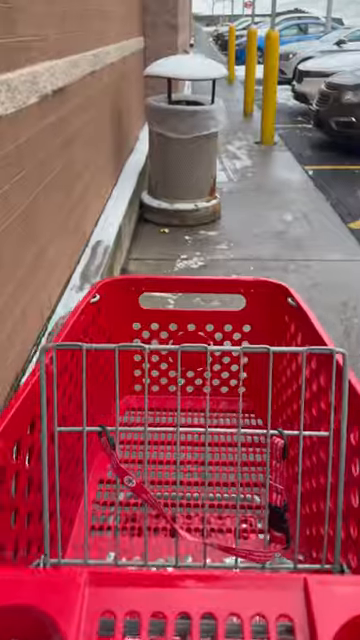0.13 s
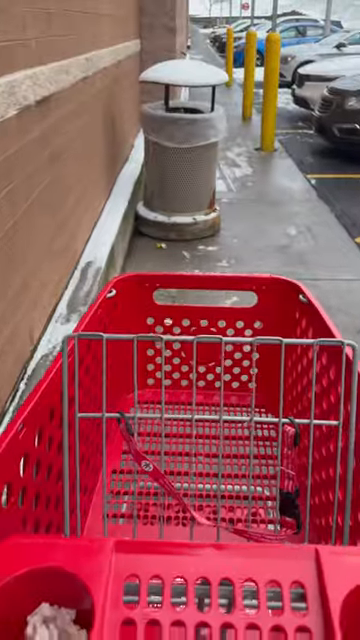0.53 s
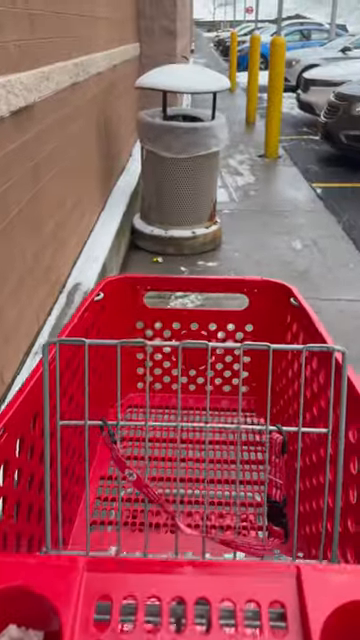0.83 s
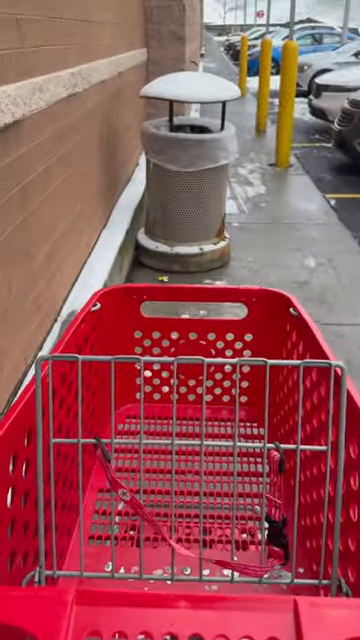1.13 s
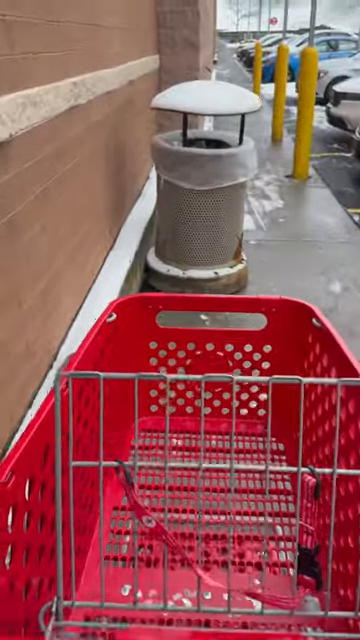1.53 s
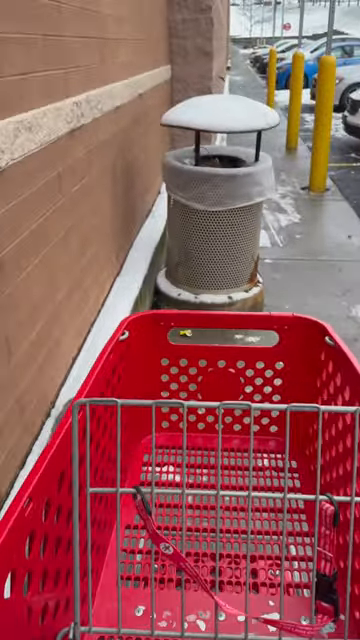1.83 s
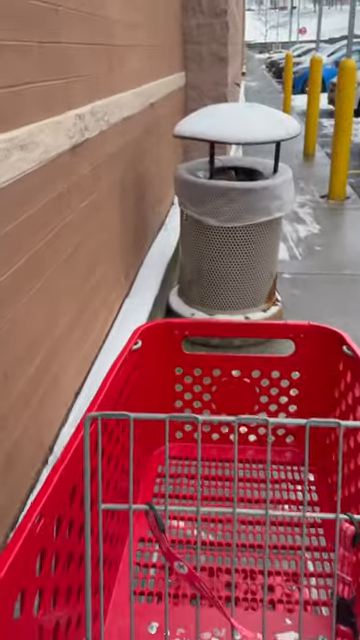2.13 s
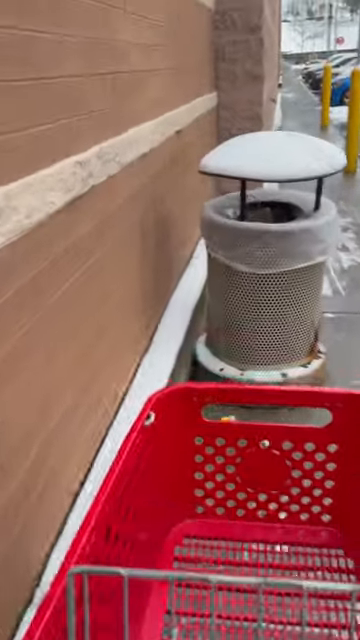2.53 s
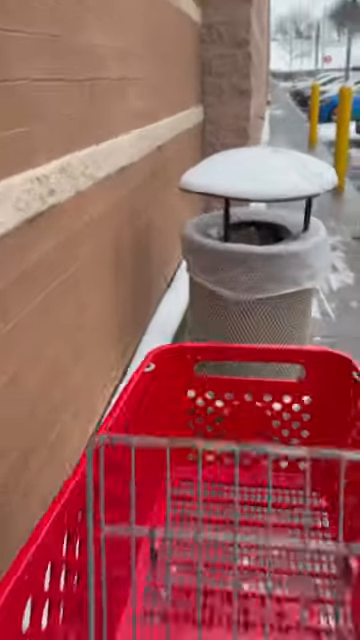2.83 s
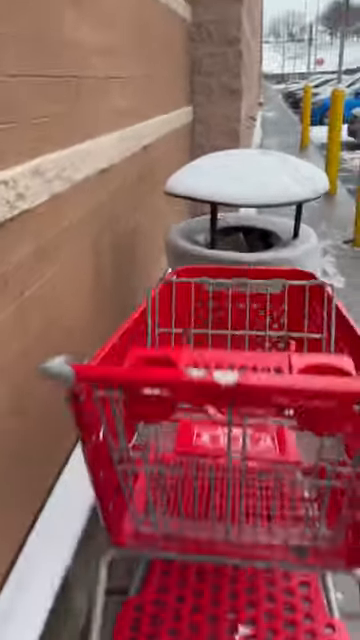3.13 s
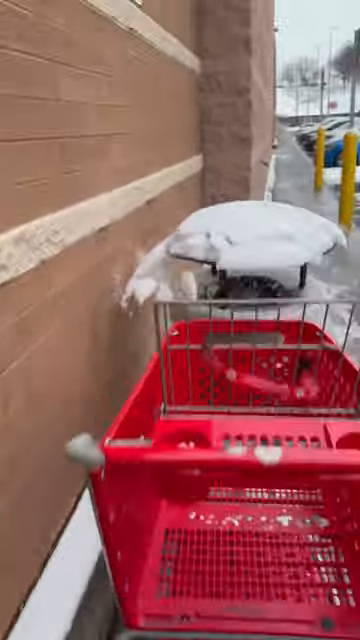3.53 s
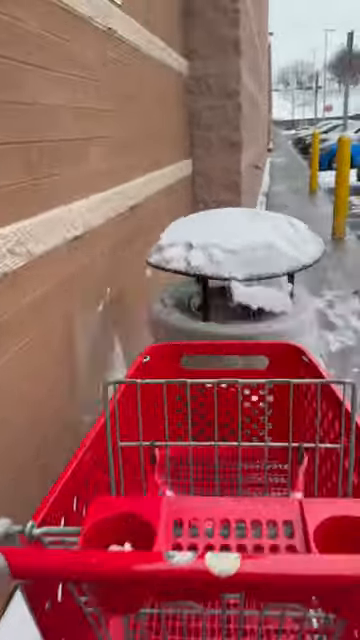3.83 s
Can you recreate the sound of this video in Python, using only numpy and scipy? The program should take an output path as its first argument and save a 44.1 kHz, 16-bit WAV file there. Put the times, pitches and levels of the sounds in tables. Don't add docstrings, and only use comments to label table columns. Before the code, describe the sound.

Shopping cart clinks and rumbles along, gets shoved, and slams a steel bin with clattering rebounds

```python
import sys
import numpy as np
from scipy import signal
from scipy.fft import rfft, irfft, next_fast_len
from scipy.io import wavfile
from scipy.ndimage import map_coordinates

SR = 44100
rng = np.random.default_rng(int(sys.argv[2]) if len(sys.argv) > 2 else 0)


def put_to_file(sound):
    columns = np.atleast_2d(sound).T
    safe = np.clip(columns, -1, 1)
    whole_steps = np.round(safe * 32767)
    wavfile.write(sys.argv[1], SR, whole_steps.astype(np.int16))


def volts(x):
    e = np.asarray(x, float) / 20
    return 10 ** e


N = 176400

# time in seconds, wire level in dB, plastic over wire in dB.
SHAKING = [(.04, -47.5, 13.5), (.85, -37.5, -3.5), (.97, -40.5, 13), (1.1, -41.5, 12.5), (1.28, -47.5, 5),
           (1.97, -46, 6.5), (2.09, -17, -5.5), (2.16, -24, 0.5), (2.25, -41.5, 10), (2.47, -63, 15),
           (2.87, -36.5, 1), (2.97, -14.5, -6), (3.13, -17, -5.5), (3.175, -33.5, 5.5), (3.3, -23, -8.5),
           (3.69, -24, -8), (3.8, -26.5, -6.5), (3.93, -34, -5.5), (3.97, -16.5, -10)]
# start in seconds, peak in dB.
EARLY_CLINKS = [(0.057, -11.5), (0.0792, -10), (0.129, -17.5), (0.1552, -20.5), (0.192, -23),
                (0.253, -22.5), (0.2874, -20.5), (0.3156, -20), (0.431, -25.5), (0.4584, -17.5),
                (0.5372, -19), (0.59, -25), (0.6784, -26), (0.7003, -20), (0.717, -10), (0.8049, -14),
                (0.812, -15.5), (0.837, -15.5), (0.8955, -10), (0.9323, -5), (0.9601, -14.5),
                (0.9772, -8.5), (0.986, -15), (1.0199, -16), (1.0338, -9.5), (1.0515, -11.5), (1.0745, -8),
                (1.0882, -15.5), (1.1166, -18), (1.1752, -24.5)]
LATE_CLINKS = [(1.245, -24.5), (1.3216, -18), (1.359, -20.5), (1.4357, -28), (1.4828, -22), (1.5525, -26),
               (1.5887, -18), (1.6317, -23), (1.6637, -23), (1.7068, -13), (1.734, -14), (1.871, -20),
               (1.998, -10.5), (2.0282, -22), (2.0341, -11.5), (2.093, -11), (2.1534, -15), (2.2617, -17.5),
               (2.3235, -18), (2.3853, -25), (2.5494, -37), (2.885, -17.5), (2.9362, -12.5), (2.965, -15),
               (3.0105, -13), (3.179, -11.5), (3.706, -6), (3.957, -11)]
# start in seconds, peak in dB, ringing in Hz (not sounded), rise
# in seconds.
GATE_SLIDES = [
    (2.5, -35, 7000, 0.0057),
    (2.585, -25.5, 7000, 0.0088),
    (2.74, -24, 6500, .012),
    (2.762, -21, 7000, 0.0032),
    (2.84, -45, 6900, 0.011),
]
# frequency in Hz, width in Hz, level in dB.
WIRE_MODES = [(4260, 35, 5), (4630, 59, 2), (5450, 47, -2), (5960, 260, -7), (7140, 40, 0),
              (7920, 140, -4.5)]
# frequency in Hz, level in dB.
WIRE_COLOUR = [(1200, -8), (2800, -4.5), (4200, -7), (6500, -1.5),
               (9000, 0), (10500, -4), (12000, -8), (15600, -9)]
# frequency in Hz, level in dB.
TICK_COLOUR = [(2500, -38), (3800, 0), (4500, 6), (6200, -2.5), (9000, 4.5), (16000, -10)]
# start in seconds, peak in dB.
BASKET_KNOCKS = [(0.076, -16), (0.115, -21), (0.198, -21), (0.288, -23), (0.435, -19), (0.539, -16.5),
                 (0.677, -19.5), (0.723, -15.5), (0.766, -18), (0.812, -15.5), (0.837, -16), (0.896, -22.5),
                 (0.934, -19), (0.96, -17), (0.985, -16), (1.04, -14.5), (1.074, -16), (1.143, -23),
                 (1.173, -18), (1.241, -19.5), (1.323, -20), (1.359, -19.5), (1.439, -20), (1.52, -22.5),
                 (1.614, -18), (1.634, -23), (1.711, -16.5), (1.893, -22.5), (1.999, -19), (2.061, -13),
                 (2.262, -19), (2.319, -19.5), (2.383, -20), (2.573, -25.5)]
# frequency in Hz, width in Hz, level in dB.
BASKET_MODES = [(437, 260, 8.5), (641.5, 4.3, 12), (924, 120, -3.5), (1300, 17, -48), (1674, 13, 4.5),
                (1971, 62, 1), (2270, 12, -36)]
# frequency in Hz, level in dB.
BASKET_COLOUR = [(120, -2.5), (300, -9.5), (600, -3), (1200, 4), (2200, 2), (3200, -5.5), (7000, -23.5)]
# start in seconds, peak in dB, ringing in Hz, rise in seconds.
CRASH_BLOWS = [(3.179, -10, 2130, 0.0012), (3.19, -7, 1980, .003), (3.2035, -4.5, 2270, 0.00069),
               (3.207, -5, 1390, 0.0016), (3.215, -3, 950, 0.0014), (3.228, 0, 1390, .0025),
               (3.236, -9.5, 1870, 0.0017), (3.247, -8, 870, 0.00079), (3.256, -10, 2440, 0.0026),
               (3.263, -3, 1040, 0.00076), (3.271, -8, 2250, .002), (3.283, -7, 860, 0.0016),
               (3.3, -15, 850, 0.0023), (3.313, -9, 2740, 0.0033), (3.327, -5, 2380, 0.0013),
               (3.418, -4.5, 2550, 0.0013), (3.428, -9, 1245, 0.0015), (3.436, -6.5, 1060, 0.0016),
               (3.447, -5, 864, 0.005), (3.535, -6.5, 2560, 0.00061), (3.546, -8.5, 2440, 0.00089),
               (3.636, -11, 950, 0.0022), (3.647, -6, 2550, 0.00075), (3.665, -10, 900, 0.0022),
               (3.703, -10.5, 1300, .002), (3.707, -1.5, 2437, 0.0017), (3.72, -8, 1020, 0.0023),
               (3.73, 0, 613, 0.0077), (3.734, -5.5, 1310, 0.0032), (3.755, -7, 650, 0.0037),
               (3.948, -13, 1960, 0.0028), (3.957, -12.5, 1200, .002), (3.98, -11, 2040, 0.0024)]
# time in seconds, level in dB.
GRINDING = [(3.17, -70), (3.182, -29), (3.2, -27), (3.208, -16), (3.27, -18), (3.295, -28), (3.335, -28.5),
            (3.4, -36), (3.6, -70)]
# frequency in Hz, level in dB.
BIN_COLOUR = [(60, -28), (200, -0.5), (700, -2), (1500, 0.5), (2500, -1.5), (4000, -6), (8000, -19),
              (16000, -31)]
# frequency in Hz, width in Hz, level in dB.
BIN_MESH = [(2550, 2000, -7)]
# start in seconds, level in dB, pitch in Hz.
TUBE_PINGS = [
    (.538, -24.5, 1990),
    (1.05, -25.5, 1940),
    (3.04, -29, 212),
    (3.21, -21.5, 218),
    (3.24, -25.5, 299),
    (3.262, -26.5, 164),
    (3.71, -30.5, 216),
]
# start in seconds, length in seconds, level in dB, pitch in Hz, pitch roughness in Hz.
CASTER_SQUEAK = (2.76, .105, -40, 3600, 120)
# time in seconds, level in dB.
ROLLING = [
    (.04, -34),
    (.9, -38.5),
    (1.2, -36),
    (1.6, -35),
    (2.3, -37),
    (2.9, -33),
    (3.3, -38),
    (3.6, -55),
    (4, -70),
]
# start in seconds, peak in dB, thud pitch in Hz.
JOINT_BUMPS = [
    (0.849, -17, 64),
    (1.26, -24, 71.5),
    (1.768, -20, 79),
    (2.332, -19, 69.5),
    (2.751, -16.5, 55.5),
    (3.269, -24.5, 84.5),
    (3.479, -21.5, 100),
]
# frequency in Hz, level in dB.
RUMBLE_COLOUR = [(15, -51), (30, -11.5), (60, 0.5), (120, -4), (200, -14.5), (400, -26), (800, -45)]
# frequency in Hz, level in dB.
STREET_COLOUR = [(88, -41), (150, -19.5), (336, -4), (1990, -23), (9000, -46), (11700, -35), (19800, -120)]
# frequency in Hz, lead in radians.
PORT_LEAD = [(500, .2), (2600, -.1), (3400, 1), (4500, -.8), (5800, -.5), (9700, -2.2), (10400, -3.12),
             (13700, -3.2), (14400, -4.1), (15600, -5)]
# frequency in Hz, difference in dB.
PORT_BALANCE = [(60, .5), (150, 1), (380, 1.5), (800, 3.2), (1400, 1), (2380, -.5), (5000, .3), (9000, 0)]
# frequency in Hz, level in dB.
DIFFUSE_COLOUR = [(60, -11.5), (250, -23), (600, -9), (1700, -19.5), (3000, 0.5), (6000, -7), (10000, -74),
                  (16000, -22)]


def unit(x):
    return x / np.sqrt(np.mean(x ** 2) + 1e-20)


def along(points, hz):
    f, v = np.transpose(points)
    return np.interp(np.log(hz + 1), np.log(f + 1), v)


def curves(rows):
    s, *cols = np.transpose(rows)
    return [np.interp(np.arange(N) / SR, s, c) for c in cols]


def wobble(rate):
    knots = rng.standard_normal(int(N * rate / SR) + 4)
    return map_coordinates(knots, [np.arange(N) * rate / SR])


def filtered(x, response):
    m = next_fast_len(N + 8192)
    return irfft(rfft(x, m) * response(np.fft.rfftfreq(m, 1 / SR)), m)[..., :N]


def body(x, colour, modes=(), modes_db=0):
    def response(hz):
        cepstrum = irfft(np.log(volts(along(colour, hz)) + 1e-6))
        cepstrum[1:len(hz) - 1] *= 2
        cepstrum[len(hz):] = 0
        ring = 1
        for f, width, db in modes:
            ring = ring + volts(db + modes_db) * 1j * hz * width / (f * f - hz * hz + 1j * hz * width)
        h = np.exp(rfft(cepstrum)) * ring
        return h / np.sqrt(np.mean(abs(h) ** 2))
    return filtered(x, response)


def hits(rows, crack_s, tail_s, tail_db, ring_s, ring_db, rise_s=0.00013, sag=0):
    noise, ring = np.zeros((2, N + SR)), np.zeros(N + SR)
    t = np.arange(SR // 2) / SR
    for s, db, hz, *rise in rows:
        i = round(s * SR)
        own_rise_s = (rise or [rise_s])[0]
        onset = 1 - np.exp(-t / max(own_rise_s, 1e-4))
        shape = onset * (volts(-60 * t / crack_s) + volts(tail_db - 60 * t / tail_s))
        noise[:, i:i + len(t)] += volts(db) * shape * rng.standard_normal((2, len(t)))
        tone = np.sin(2 * np.pi * hz * t * (1 - sag * np.minimum(t / ring_s, 1) / 2))
        ring[i:i + len(t)] += onset * volts(db + ring_db - 60 * t / ring_s) * tone
    return noise[:, :N], ring[:N] * [[1], [0]]


def pick(rows, modes):
    return [(s, db, modes[int(rng.random() * len(modes))][0]) for s, db in rows]


def rattle(level_db, life_s, spread_db, clump_db):
    contacts_per_s = 700
    size_db = spread_db * np.minimum(rng.exponential(size=N), 3.5) + clump_db * wobble(75)
    taps = (rng.random(N) < contacts_per_s / SR) * volts(size_db)
    decay = volts(-120 * np.arange(SR // 4) / SR / life_s)
    power = signal.fftconvolve(taps ** 2, decay)[:N]
    return volts(level_db) * unit(np.sqrt(abs(power)) * rng.standard_normal((2, N)))


def wire():
    clinks = pick(EARLY_CLINKS + LATE_CLINKS, WIRE_MODES)
    noise, ring = hits(clinks, 0.047, 0.25, tail_db=-9.5, ring_s=0.026, ring_db=-8, rise_s=0.00034)
    slides, _ = hits(GATE_SLIDES, 0.068, 0.26, tail_db=-5.5, ring_s=.1, ring_db=-99)
    shake_db = curves(SHAKING)[0]
    chatter = rattle(shake_db, 0.042, spread_db=2.5, clump_db=2.6)
    wash, _ = hits(CRASH_BLOWS, 0.0095, 0.54, tail_db=-3, ring_s=.1, ring_db=-99)
    contact = volts(-7) * noise + volts(-6) * slides + chatter + volts(-19) * wash
    return body(contact, WIRE_COLOUR, WIRE_MODES, modes_db=2.5) + ring


def ticks():
    rows = [(s, db, 0) for s, db in EARLY_CLINKS + LATE_CLINKS]
    noise, _ = hits(rows, 0.011, 0.03, tail_db=-15, ring_s=.1, ring_db=-99, rise_s=0.0003)
    return body(volts(-5) * noise, TICK_COLOUR)


def basket():
    shake_db, plastic_db = curves(SHAKING)
    knocks = pick(BASKET_KNOCKS, BASKET_MODES)
    noise, ring = hits(knocks, 0.02, 0.33, tail_db=-5.5, ring_s=0.099, ring_db=-7.5, rise_s=0.0013)
    drum = rattle(shake_db + plastic_db, 0.064, spread_db=1.5, clump_db=2.7)
    return body(volts(-6.5) * noise + drum, BASKET_COLOUR, BASKET_MODES, modes_db=0) + ring


def crash():
    noise, ring = hits(CRASH_BLOWS, 0.013, 0.099, tail_db=-8.5, ring_s=0.03, ring_db=-3.5, sag=0.036)
    grind = rattle(curves(GRINDING)[0], 0.038, spread_db=0.0, clump_db=3.2)
    return body(volts(-6.5) * noise + grind, BIN_COLOUR, BIN_MESH) + ring


def tubes():
    _, ring = hits(TUBE_PINGS, .01, .1, tail_db=-99, ring_s=0.13, ring_db=5, rise_s=0.0014)
    return ring


def caster():
    s, length, db, hz, roughness = CASTER_SQUEAK
    stroke = np.clip((np.arange(N) / SR - s) / length, 0, 1)
    pitch = hz * (1 - 0.074 * stroke ** 2) + roughness * wobble(400)
    phase = 2 * np.pi * np.cumsum(pitch) / SR
    squeak = np.sqrt(abs(np.sin(np.pi * stroke))) * (np.sin(phase) + np.sin(2 * phase))
    return volts(db) * squeak * [[1], [.5]]


def wheels():
    lumps = volts(2.2 * wobble(14) + .8 * wobble(3.1))
    noise, thud = hits(JOINT_BUMPS, 0.1, 0.11, tail_db=-20, ring_s=0.16, ring_db=-3.0, rise_s=0.0054)
    rumble = volts(curves(ROLLING)[0]) * unit(lumps * rng.standard_normal((2, N)))
    return body(rumble + volts(-6.5) * noise, RUMBLE_COLOUR) + thud


def street():
    roll_db, = curves(ROLLING)
    level_db = -44.5 + 0.86 * (roll_db - roll_db[0]) + 1.8 * wobble(25.46)
    return volts(level_db) * body(rng.standard_normal((2, N)), STREET_COLOUR)


def two_ports(direct, diffuse, contact):
    sign = np.array([[1], [-1]])
    leak_hz, leak_db = 7940, -30
    fade_per_s, fade_bias = 16, .6

    def direct_path(hz):
        return np.exp(.5j * sign * along(PORT_LEAD, hz)) * volts(sign * along(PORT_BALANCE, hz) / 2)

    def scattered_path(hz):
        leak = 1j * volts(leak_db) / (1 + (leak_hz / (hz + 1)) ** 4)
        return sign * volts(along(DIFFUSE_COLOUR, hz)) + leak

    ports = filtered(direct, direct_path)
    topmost = filtered(ports.mean(axis=0), lambda hz: hz > PORT_LEAD[-3][0])
    ports = ports - np.clip(1 - fade_bias - wobble(fade_per_s), 0, 1) * topmost
    off_axis = volts(-13) * filtered(contact[1], lambda hz: hz > 9600)
    return ports + filtered(diffuse, scattered_path) + off_axis


def scene():
    contact = ticks()
    direct, diffuse = wire() + contact + tubes() + caster() + basket() + crash() + wheels() + street()
    return two_ports(direct, diffuse, contact)


def band_limit(x):
    return signal.sosfilt(signal.butter(12, 16990, fs=SR, output="sos"), x)


def record(dry):
    clip, top_hz, start_s = .86, 15900, .0345
    clipped = dry / (1 + abs(dry / clip) ** 4) ** (1 / 4)
    x = filtered(clipped, lambda hz: hz < top_hz)
    return band_limit(x * (np.arange(N) > start_s * SR))


dry = scene()
out = record(dry)
put_to_file(out)
```